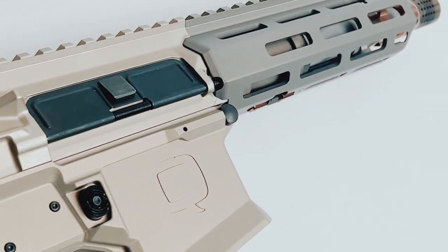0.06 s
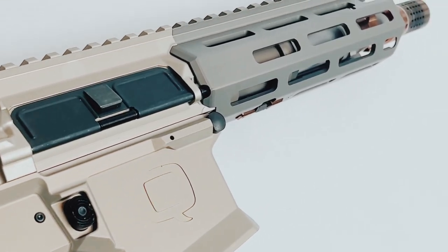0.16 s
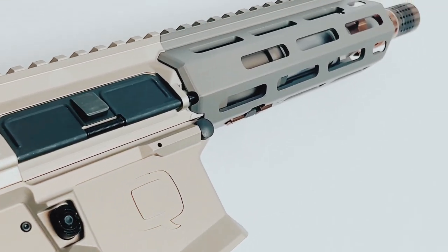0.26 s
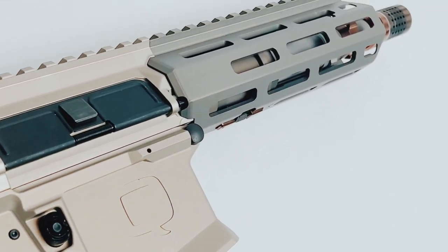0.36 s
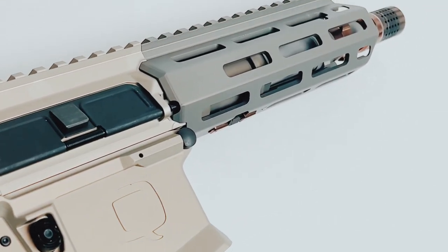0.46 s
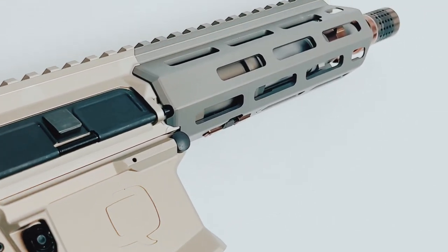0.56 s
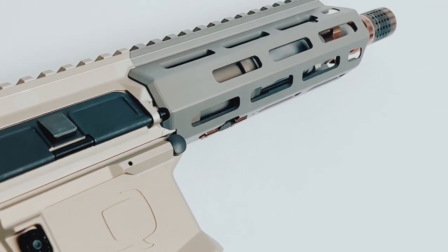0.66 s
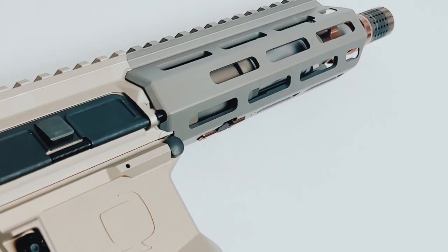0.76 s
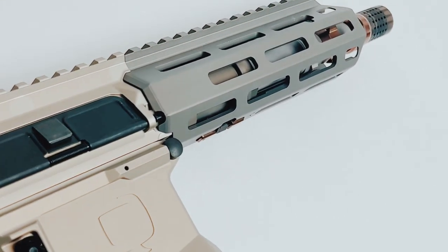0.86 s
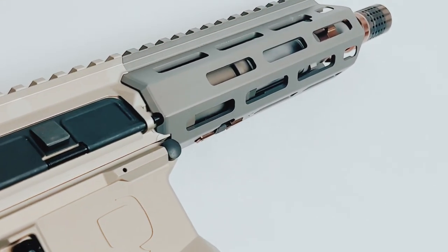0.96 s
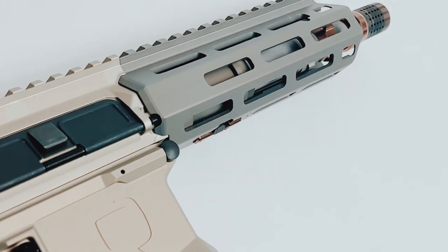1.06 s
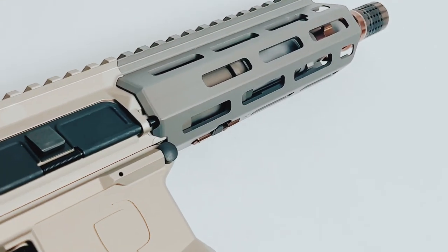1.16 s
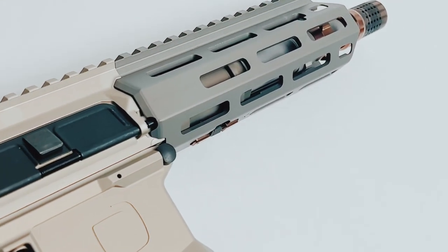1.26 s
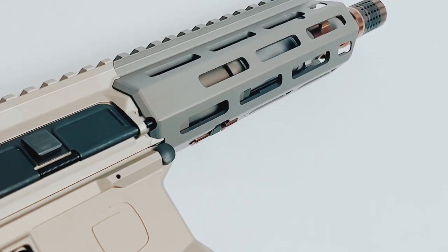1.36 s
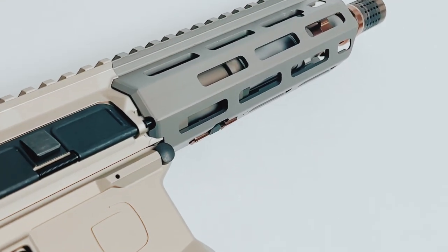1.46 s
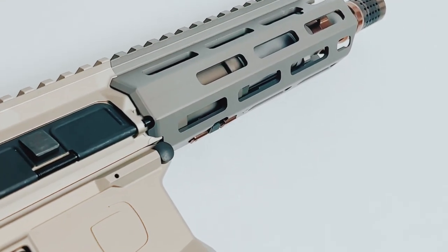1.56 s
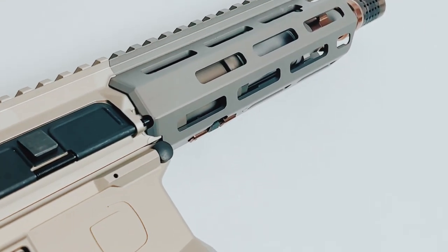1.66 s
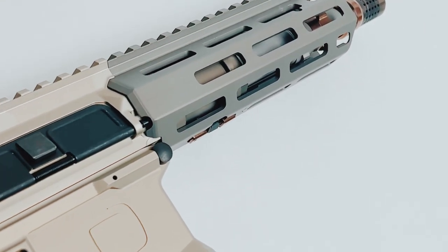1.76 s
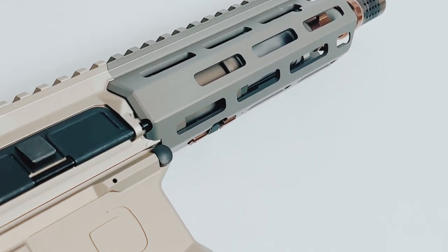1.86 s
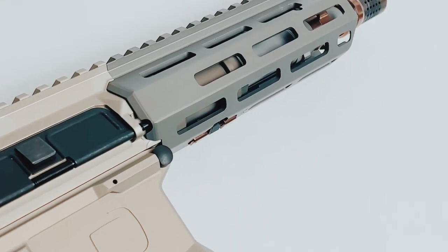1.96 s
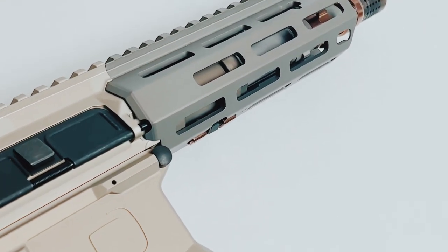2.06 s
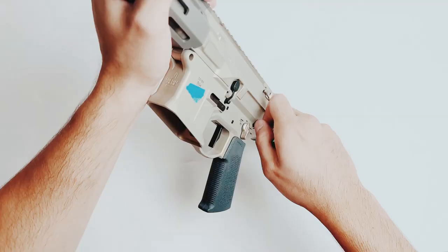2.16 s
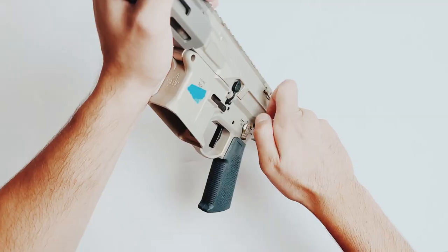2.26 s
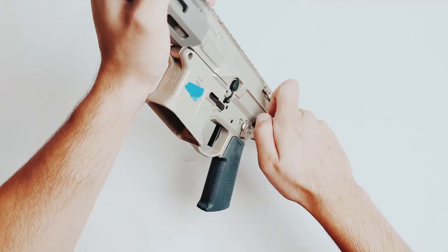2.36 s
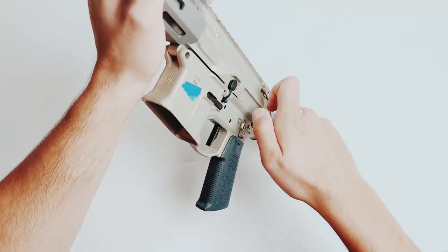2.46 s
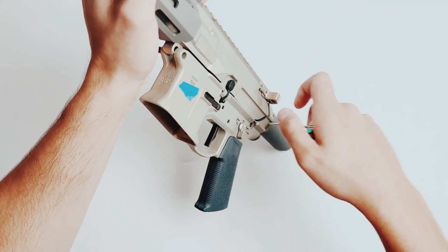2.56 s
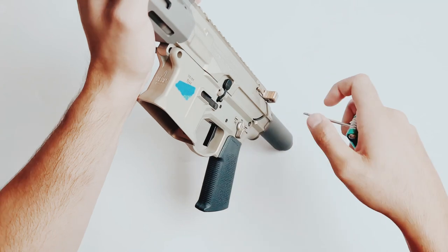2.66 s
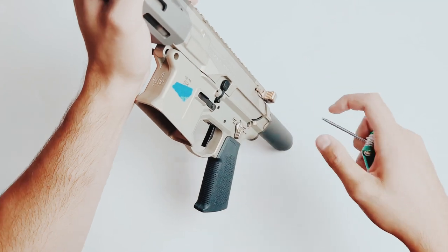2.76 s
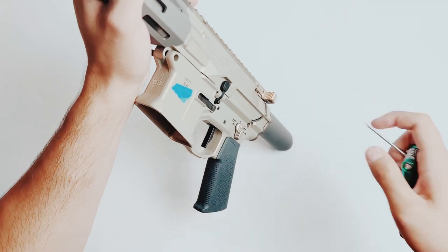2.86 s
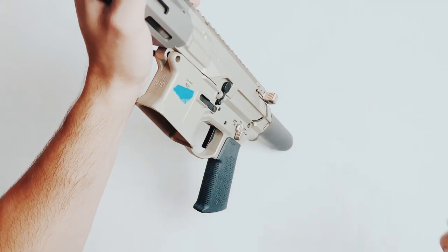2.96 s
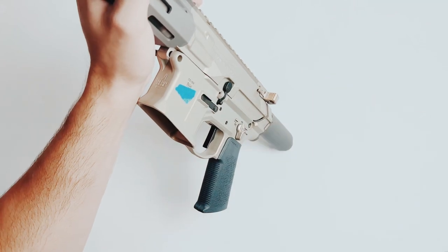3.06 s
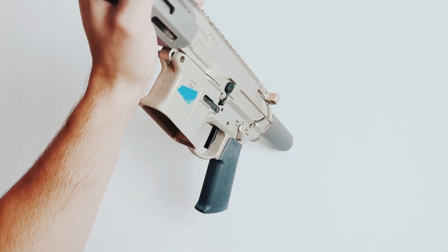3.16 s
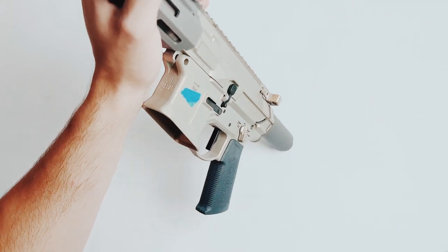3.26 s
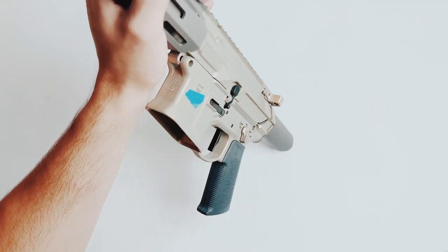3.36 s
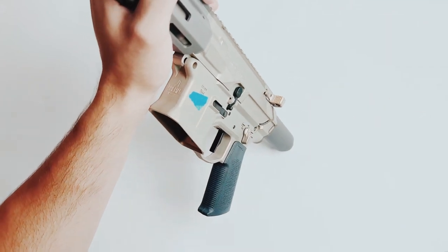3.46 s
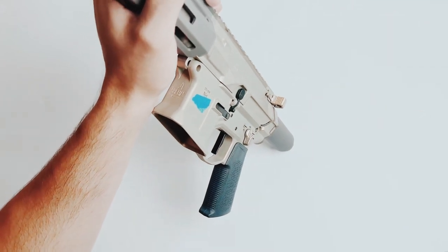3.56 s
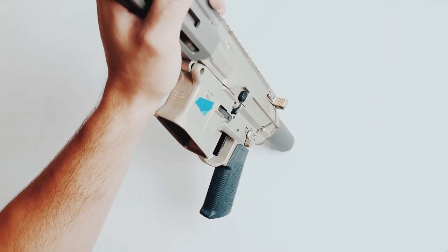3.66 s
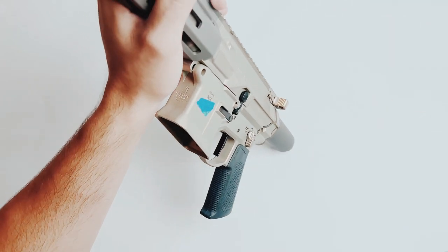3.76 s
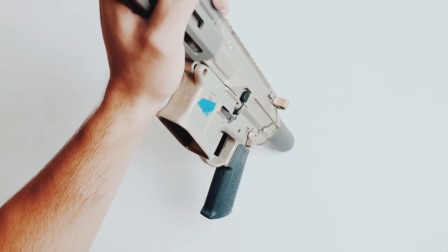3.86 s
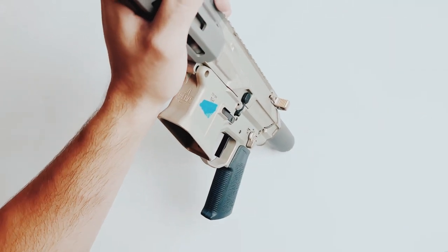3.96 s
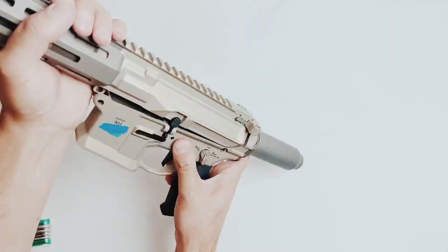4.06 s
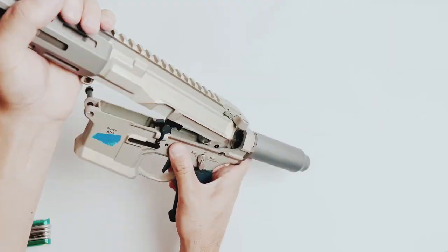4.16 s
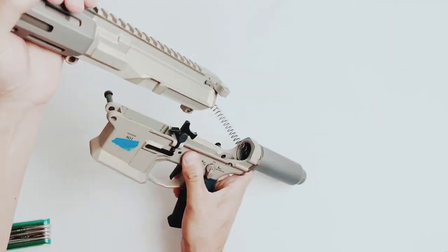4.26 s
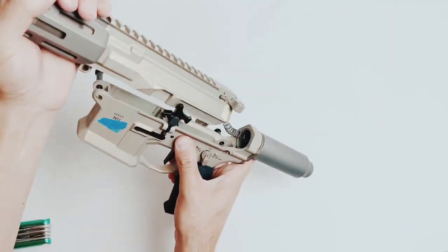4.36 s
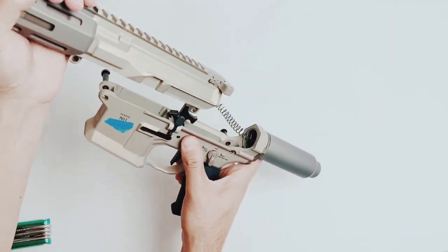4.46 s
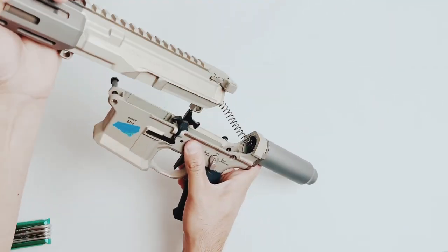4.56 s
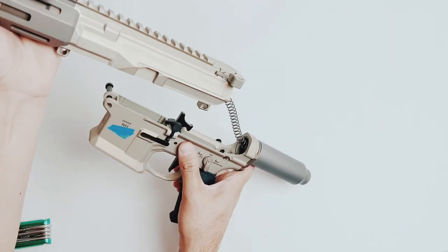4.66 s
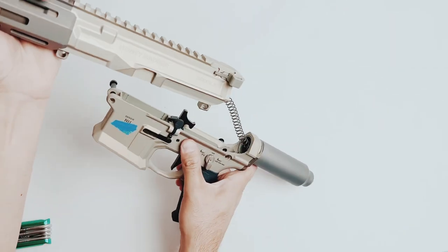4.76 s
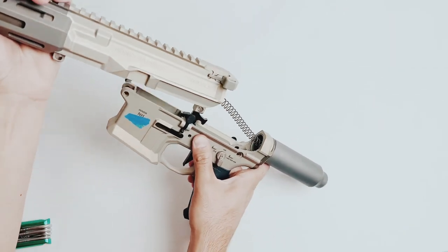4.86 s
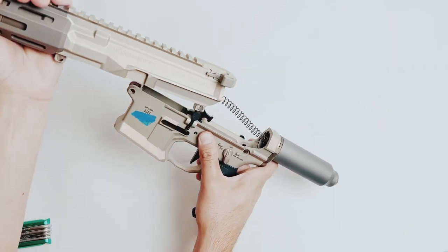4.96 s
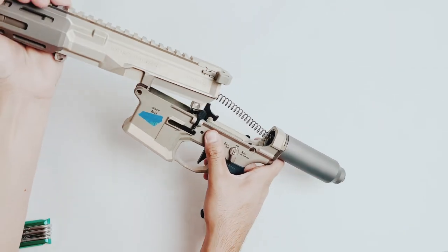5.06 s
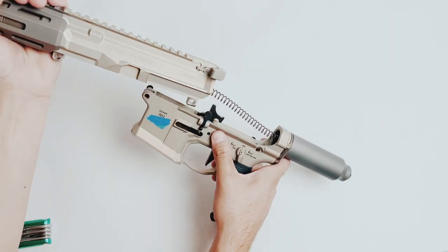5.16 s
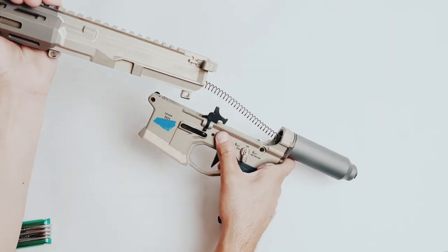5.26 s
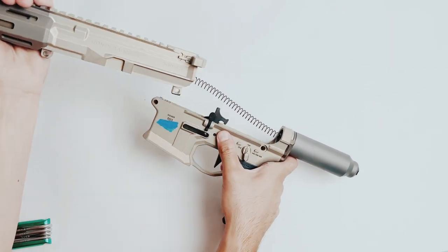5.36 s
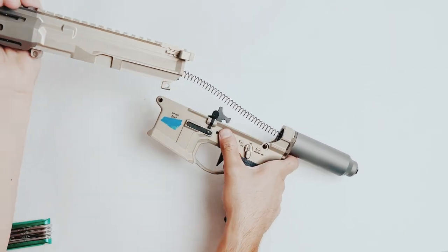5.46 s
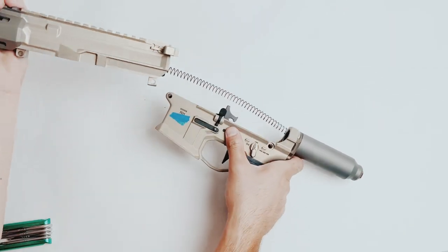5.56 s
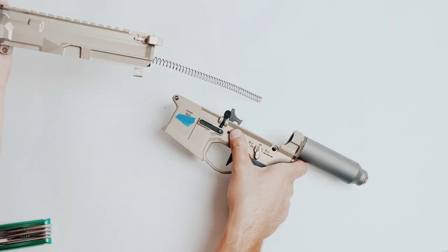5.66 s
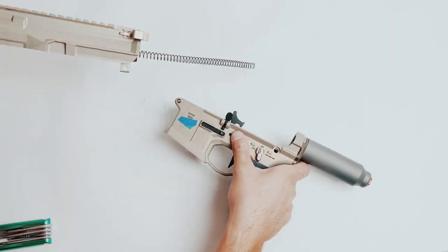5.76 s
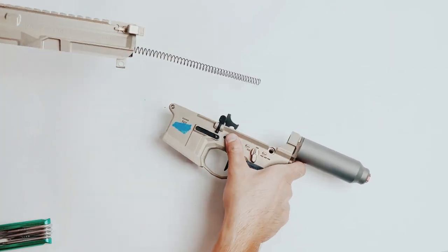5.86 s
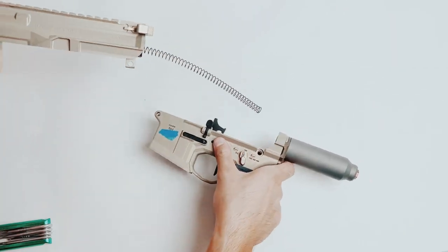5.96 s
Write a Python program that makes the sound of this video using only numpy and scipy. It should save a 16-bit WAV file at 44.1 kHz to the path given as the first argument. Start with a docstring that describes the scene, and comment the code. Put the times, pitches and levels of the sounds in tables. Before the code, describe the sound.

In a small quiet room, close to the microphone, low hum and soft hand bumps come first. After two seconds a tight pin clicks out in two quick groups, with dull thuds and a tiny squeal. A near-silent pause follows, then the metal halves unlatch with bright, hard clacks and a raspy twang of spring. Faint scraping trails off into a last small click.

```python
"""In a small quiet room, hands take a rifle apart just above a bench. A pin is pushed out with a click and a scrape,
the upper and lower halves unlatch and clack together, and a long coil spring rasps out of its tube.
Contacts are noise bursts with ringing modes; scrapes, squeals and the spring are tiny random clicks sent
through filters, with wavering tones for the singing. Dull swelling knocks come through the bench, the palm
and fingers brush the parts, and a low hum, soft rumble and faint hiss lie underneath."""
import sys
import numpy as np
from scipy import signal
from scipy.fft import rfft, irfft
from scipy.io import wavfile
from scipy.ndimage import uniform_filter1d

SR = 44100
rng = np.random.default_rng(int(sys.argv[2]) if len(sys.argv) > 2 else 0)


def to_wav(sig):
    """Store sig (one row per channel, or 1-D mono) as 16-bit WAV at the path in sys.argv[1].

    Samples outside -1..1 are clipped; the rate is SR.
    """
    pcm = np.clip(np.atleast_2d(sig), -1, 1) * 32767
    pcm = np.round(pcm).astype(np.int16)
    wavfile.write(sys.argv[1], SR, pcm.T)  # frames by channels


N = 264745

# metal-on-metal contacts: start_s, level_db, bass_db (weight), treble_slope_db_per_octave (hardness), t60_s
# t60_s is always the time to fade by 60 dB; levels are set before any trim inside the functions
BLOWS = [(1.747, -48.5, 7.5, -22, 0.076), (2.073, -63.5, 5.5, -21, 0.041), (2.197, -55.5, 2, -7, 0.2),
         (2.218, -47.5, -16, -15, .07), (2.232, -51.5, -1, 9, 0.078), (2.2336, -34.5, -3, -7, 0.096),
         (2.2408, -44, 1, -2.5, 0.097), (2.256, -33.5, -4, -10, 0.09), (2.433, -56.5, 8.5, -1, 0.39),
         (2.511, -49.5, 0, 0.5, 0.044), (2.5233, -34, -2, -10.5, 0.11), (2.539, -46, 4, -2.5, 0.05),
         (2.552, -43, -5, -13, 0.073), (2.561, -48, 17, -11.5, 0.11), (2.668, -34, -4, -7, 0.074),
         (2.956, -64.5, 7, -9.5, 0.038), (3.058, -65.5, 0.5, 1.9, .04), (3.893, -58.5, 8.5, -4, 0.091),
         (3.994, -41, 5, 0, 0.025), (4.0006, -39.5, -4, -7, 0.029), (4.121, -49, -9, -19, 0.048),
         (4.1445, -32, -10.5, 2.2, 0.21), (4.1531, -24.5, -29.5, -7.5, 0.027),
         (4.1603, -35, -26.5, 3.5, 0.088), (4.1659, -32, -19.5, -6, 0.064), (4.172, -23.5, -38, -8, .028),
         (4.339, -20.5, -45.5, -4.5, 0.023), (4.342, -28.5, -14.5, -1, 0.078),
         (4.3524, -33.5, -24, -2, .056), (4.3572, -36, -8, -12.5, 0.079), (4.875, -49.5, -27, -11, 0.092),
         (4.908, -47, -16, -6, 0.096), (4.917, -37.5, -21.5, -3, 0.056), (5.134, -80, -8, 5, .02),
         (5.463, -81, -10, 9.5, .03), (5.577, -70.5, -3.5, 9.5, 0.096), (5.683, -56.5, 1.5, 0.5, 0.22),
         (5.728, -69, 17, 6, .08), (5.873, -41.5, -2, -7.5, 0.11)]
# centres of the five pitch regions of a contact: pitch_hz
BLOW_HZ = [500, 1550, 3450, 6900, 12400]
# colour that all contacts share in those regions: level_db
CONTACT_DB = [-1, -0.97, 1, -0.32, -.8]
# ringing of the two halves: pitch_hz, relative_level_db, t60_s
BODY = [(376, 5, 0.048), (453.3, 0, 0.071), (744, -8, 0.13), (944, -3.5, 0.057), (1066, -10.5, 0.11),
        (1285, -3, 0.067), (1533, -4.5, 0.043), (1674, -7, 0.13), (1844, 0, 0.04), (2152, -2, 0.085),
        (2560, -7, 0.098), (2827, -2, 0.18), (3070, -8, 0.12), (3550, -13.5, 0.027), (3990, -6, 0.079),
        (4265, -8, 0.13), (5650, -5, 0.078), (6540, -5, 0.087), (7790, -2, .06), (8570, 7, .05)]
# resonances of the scraped coil spring: pitch_hz, width_hz, relative_level_db
COIL = [(3240, 470, -10.5), (6070, 520, -20.5), (7240, 130, -0.5), (7490, 170, 1), (7690, 73, 3),
        (8070, 660, -8), (9290, 300, -9), (12000, 360, -24), (14000, 300, -23), (13440, 180, 3),
        (14600, 62, 0.5), (15700, 160, -5)]
COIL_TONE_HZ, COIL_TONE_WIDTH_HZ = 2831, 80
# the spring drags over the rim of its tube in short tugs, then in one long pull:
# full_s (time at which the swell reaches full strength, here and below), length_s, rasp_db, singing_tone_db
TUGS = [(4.141, 0.048, -52, -46), (4.19, 0.04, -35.5, -45), (4.25, 0.064, -50, -62.5),
        (4.325, 0.011, -42.5, -58), (4.457, 0.012, -51, -59), (4.615, 0.026, -65.5, -67),
        (4.717, 0.0074, -73, -68.5), (4.811, 0.017, -59.5, -56.5), (4.988, 0.015, -67, -59),
        (5.064, 0.095, -63, -61), (5.176, 0.41, -61.5, -57.5), (5.536, 0.015, -52, -46)]
TUG_RISE_S, TUG_T60_S = 0.038, 0.11
# tone of dry friction: pitch_hz, relative_level_db
FRICTION = [(150, -7.5), (400, -2.5), (800, -0.5), (1800, 0), (4000, -1), (5200, -5.5), (7800, 1),
            (9000, -6.5), (10500, -10), (16000, -11.5)]
# the metal faces rub, then come to rest: full_s, length_s, level_db, t60_s, brightness_db
RUBS = [(2.22, .01, -51, .26, -9.5), (2.487, 0.024, -47, .19, -2), (3.894, 0.078, -71, 0.13, -5),
        (4.001, 0.028, -50, 0.3, -3.5), (4.148, 0.06, -40.5, 0.16, 4), (4.197, 0.029, -38, .12, 4),
        (4.348, 0.0042, -30, 0.053, 2), (4.428, 0.031, -58, 0.34, 0), (4.804, 0.021, -63, 0.13, -1),
        (4.969, 0.064, -63, 0.13, -1.5), (5.363, .38, -69, 0.49, -6), (5.88, 0.13, -67.5, 0.34, 6.5)]
RUB_RISE_S = 0.055
RUB_SPLIT_HZ = 3800  # brightness tips the balance around this frequency
# the tight pin binds and squeals: full_s, length_s, level_db
SQUEALS = [(2.478, .014, -48.5), (2.497, .004, -39), (2.56, .006, -61)]
SQUEAL_RISE_S, SQUEAL_T60_S = 0.04, 0.06
PIN_HZ = 3050  # pitch of the sliding pin's squeal
# small parts ring briefly when jerked or knocked: start_s, pitch_hz, peak_db, t60_s
SMALL_RINGS = [(2.241, 3050, -27, 0.015), (2.2563, 3000, -32, 0.021), (2.5243, 3000, -35, 0.042),
               (2.55, 3080, -42, 0.029), (2.564, 3100, -40.5, 0.03), (2.956, 3015, -60, 0.04),
               (4.1193, 2500, -42.5, 0.043)]
# the steel key slips off the pin and rings on: pitch_hz, level_db, t60_s
KEY = [(1240, -65.5, 0.56), (2150, -67, 0.36), (3100, -59, 0.39), (3860, -58.5, 0.34), (5300, -59.5, 0.18)]
KEY_S = 2.668
# dull knocks through the hands and bench: start_s, level_db, pitch_hz, swell_s, t60_s
THUMPS = [(1.116, -42, 61.6, 0.038, 0.49), (1.192, -60, 58, .01, 0.11), (1.759, -35, 108.7, 0.0092, 0.09),
          (1.798, -42.5, 85.4, 0.0065, 0.14), (1.948, -49.5, 60.8, 0.087, 0.3),
          (2.233, -39.5, 210, .002, .04), (2.244, -24, 75.4, 0.021, 0.12),
          (2.257, -40.5, 105.8, 0.0055, 0.087), (2.327, -38, 69.7, 0.008, 0.36),
          (2.448, -38.5, 63.5, 0.011, 0.22), (2.517, -27.5, 238, 0.0009, 0.017),
          (2.521, -22.5, 64, 0.0092, 0.17), (2.555, -21.5, 75, 0.0092, 0.2), (2.655, -35, 75, 0.0079, 0.1),
          (4.344, -41.5, 277, 0.0045, 0.05), (5.883, -37.5, 60, 0.007, 0.21)]
# the hands tighten their grip: full_s, length_s, level_db
GRIPS = [(1.2, 0.52, -51.5), (1.8, 0.24, -53), (2.3, 0.4, -51.5)]
GRIP_RISE_S, GRIP_T60_S, GRIP_REST_DB = 0.46, 0.65, -68
# soft scuffs of the palm: start_s, level_db, brightness_db, t60_s
SCUFFS = [(0.932, -55, -13.5, 0.16), (1.77, -59, -5.5, 0.2), (1.81, -57, -13, 0.1),
          (5.732, -58.5, -20, 0.23), (5.775, -60.5, -6, 0.18), (5.832, -50.5, 3, 0.12)]
# fingers creep over the finish: full_s, length_s, level_db
CREEPS = [(1.26, 0.058, -82.5), (1.35, 0.013, -69), (1.683, .002, -73), (3.8, 0.038, -83.5)]
CREEP_RISE_S, CREEP_T60_S = 0.055, 0.077
# tone of the room rumble: pitch_hz, relative_level_db
AIR = [(25, -31), (42, -3.5), (60, -0.5), (85, -10), (120, -7), (190, -6.5), (230, -15.5), (380, -21.5),
       (700, -38.5), (1200, -43.5), (1600, -34), (2100, -39), (2700, -59), (7000, -56.5), (16000, -78.5)]
AIR_DB = -57.5  # rumble level before its trim
# slowly wavering hum tones: pitch_hz, level_db
HUM = [(59.2, -60), (96.9, -66), (193.8, -68.5), (382.2, -82)]
# the lowest hum tone rises near the end and stays up
HUM_SWELL_S, HUM_SWELL_RISE_S, HUM_SWELL_DB = 4.95, 0.2, 5.5
# faint hiss of the room, joined by straight lines: time_s, level_db
HISS = [(0, -93), (2.1, -99), (2.8, -71.5), (3.6, -75), (4.6, -68.5), (6, -72)]
TOP_HZ = 15900  # nothing much is left above this


def clacks(db=-5.0):
    """Parts knock together: heavy contacts have more bass, hard ones more treble."""
    out = np.zeros(N + SR)
    octaves = np.log2(np.array(BLOW_HZ[1:]) / BLOW_HZ[1])
    for s, level, bass, slope, t60 in BLOWS:
        strengths = level + np.r_[bass, slope * octaves] + CONTACT_DB
        x = blow(strengths, t60)
        i = int(s * SR)
        out[i:i + len(x)] += x
    return undb(db) * out[:N]


def blow(strengths, t60, crack_t60=0.023, crack_db=6, modes_db=-13, scatter_db=2.0, bass_db=-9):
    """A crack of contact, a short wash of dense modes, and the longer ring of the body."""
    t = np.arange(SR // 4) / SR
    envelope = undb(crack_db) * fade(t, crack_t60) + fade(t, t60)
    x = rng.standard_normal(len(t)) * envelope
    for hz, db, ring_t60 in BODY:
        size, sign = rng.standard_normal(2)
        gain = np.sign(sign) * undb(modes_db + db + scatter_db * size)
        x += gain * np.sin(2 * np.pi * hz * t) * fade(t, ring_t60)
    # set how much each region gets in the first instant (512 samples)
    edges = np.array([250, 1000, 2400, 5000, 9500, 16000])  # Hz
    order = 512
    power = 2 * np.abs(rfft(x[:order]) / order) ** 2
    held = np.diff(np.cumsum(power)[edges * order // SR])
    gains = np.array(strengths) - 10 * np.log10(held)
    return colour(x, [(80, gains[0] + bass_db), *zip(BLOW_HZ, gains)])


def spring(rasp_db=-1, tone_db=-1, grit_db=-18):
    """Coils tick over the rim; the wire sings in one low mode and rasps in the higher ones."""
    rasp, tone = tugs()
    ticks = slips(rate=2200, spread_db=4, catch_rate=160, catch_db=1.8)
    wire = unit(sum(undb(db) * resonate(resonate(ticks, hz, width), hz, width) for hz, width, db in COIL))
    # stronger pulls grind with a broad grit
    grit = unit(colour(ticks, [(500, -36.0), (1800, -9), (5000, -1), (12000, 11.0), (16000, 10)]))
    grit *= undb(grit_db) + 1.2 * rasp / rasp.max()
    sing = squeal(ticks, COIL_TONE_HZ, waver_hz=20, width_hz=COIL_TONE_WIDTH_HZ, rough_db=-4)
    return undb(rasp_db) * rasp * (wire + grit) + undb(tone_db) * tone * sing


def tugs(catch_rate=28, catch_db=1.0):
    """Strength of the spring's rasp and tone: each pull runs unevenly as the coils catch."""
    catching = undb(catch_db * walk(catch_rate))
    rasp = strokes([(full_s, length, db) for full_s, length, db, _ in TUGS], TUG_RISE_S, TUG_T60_S)
    tone = strokes([(full_s, length, db) for full_s, length, _, db in TUGS], TUG_RISE_S, TUG_T60_S)
    return rasp * catching, tone * catching


def sliding(friction_db=-1, body_db=3):
    """Dry friction shakes the body; the tight pin squeals in its hole."""
    bite = strokes(SQUEALS, SQUEAL_RISE_S, SQUEAL_T60_S)
    friction = slips(rate=4500, spread_db=0.5, catch_rate=120, catch_db=2.0)
    # a mode's fade time sets the width of its resonance
    body = sum(undb(db) * resonate(friction, hz, np.log(1000) / np.pi / t60) for hz, db, t60 in BODY)
    faces = unit(colour(friction + undb(body_db) * body, FRICTION))
    pin = squeal(friction, PIN_HZ, waver_hz=64.3, width_hz=460, rough_db=-8.0)
    return undb(friction_db) * rubs(faces) + bite * pin


def rubs(faces):
    """Play the friction in separate rubs, some dull and some bright."""
    dull = signal.sosfilt(signal.butter(1, RUB_SPLIT_HZ, fs=SR, output="sos"), faces)
    levels = np.array([db + stroke(full_s, length, RUB_RISE_S, t60) for full_s, length, db, t60, _ in RUBS])
    bright = np.array(RUBS)[:, -1:]
    dull_gain = undb(np.max(levels - bright / 2, axis=0))
    bright_gain = undb(np.max(levels + bright, axis=0))
    return dull_gain * dull + bright_gain * (faces - dull)


def squeal(ticks, hz, waver_hz, width_hz, rough_db):
    """Friction locks to one mode: a wavering tone, roughened by the separate slips."""
    tone = np.sqrt(2) * np.sin(2 * np.pi * np.cumsum(hz + waver_hz * walk(90)) / SR)
    rough = unit(resonate(resonate(ticks, hz, width_hz), hz, 500))
    return unit(tone + undb(rough_db) * rough)


def small_parts_and_key(split=0.016):
    """Small parts ring briefly when jerked or knocked; the free key rings longer, in beating pairs of bending modes."""
    small = sum(ring(*row) for row in SMALL_RINGS)
    pair = (1 - split, 1 + split)
    key = sum(ring(KEY_S, hz * side, db, t60) for hz, db, t60 in KEY for side in pair) / 2
    return small + key


def ring(s, hz, db, t60):
    """One struck mode: a sine that starts at time s and dies away."""
    t = np.maximum(np.arange(N) / SR - s, 0)
    return undb(db) * np.sin(2 * np.pi * hz * t) * fade(t, t60)


def thumps(thud_db=-15):
    """Soft pushes swell and die in the low mode of the bench, with a woolly thud added."""
    out = np.zeros(N)
    thud_tone = [(50, -17.5), (130, 13), (250, 0.0), (500, -17), (1000, -44), (3000, -49.0)]
    thud = undb(thud_db) * unit(colour(rng.standard_normal(N), thud_tone))
    for s, db, hz, swell, t60 in THUMPS:
        t = np.maximum(np.arange(N) / SR - s, 0)
        shape = np.minimum(t / swell, 1) * fade(np.maximum(t - swell, 0), t60)
        out += undb(db) * shape * (np.sin(2 * np.pi * hz * t) + thud)
    return out


def grip(hz=82, width_hz=22):
    """Trembling hands keep the low mode stirring: noise through a narrow resonance."""
    effort = np.maximum(strokes(GRIPS, GRIP_RISE_S, GRIP_T60_S), undb(GRIP_REST_DB))
    return effort * unit(resonate(resonate(rng.standard_normal(N), hz, width_hz), hz, width_hz))


def scuffs(swell_s=0.01):
    """The palm brushes the hollow grip: woolly noise bursts, some brighter than others."""
    out = np.zeros(N)
    t = np.arange(SR // 4) / SR
    for s, db, bright_db, t60 in SCUFFS:
        tone = [(150, -6), (450, 2), (800, -9), (1900, bright_db - 9), (3500, bright_db - 28), (12000, -54)]
        brush = unit(colour(rng.standard_normal(len(t)), tone))
        x = undb(db) * brush * np.minimum(t / swell_s, 1) * fade(t, t60)
        i = int(s * SR)
        out[i:i + len(x)] += x[:N - i]
    return out


def fingers():
    """Skin creeps over the metal in fine crackles."""
    clicks = slips(rate=900, spread_db=5, catch_rate=84, catch_db=8.0)
    crackle = colour(clicks, [(2000, -25.5), (5000, -3.5), (8500, 8.0), (12000, -11), (15000, -15)])
    return strokes(CREEPS, CREEP_RISE_S, CREEP_T60_S) * unit(crackle)


def bench(x, db=-6, delay_s=0.00066, t60=0.035):
    """Bench, hands and parts scatter the sound within milliseconds, with opposite sign at the two ports."""
    t = np.arange(SR // 16) / SR
    echo = rng.standard_normal(len(t)) * (t > delay_s) * fade(t, t60)
    scattered = signal.fftconvolve(x, echo / np.linalg.norm(echo))[:N]
    return undb(db) * scattered * np.array([[1], [-1]])


def room(x, wet_db=-14, t60=0.48, treble_t60=0.22, split_hz=5000, build_s=0.013):
    """Close walls give a short diffuse tail, different at each port; the treble dies first."""
    t = np.arange(SR // 2) / SR
    tails = []
    for noise in rng.standard_normal((2, len(t))):
        low = signal.sosfilt(signal.butter(2, split_hz, fs=SR, output="sos"), noise)
        high = signal.sosfilt(signal.butter(2, split_hz, "high", fs=SR, output="sos"), noise)
        # subtracting the treble joins the two bands without a notch
        tail = (low * fade(t, t60) - high * fade(t, treble_t60)) * np.minimum(t / build_s, 1)
        tails.append(signal.fftconvolve(x, tail / np.sqrt(np.sum(tail ** 2)))[:N])
    return undb(wet_db) * np.array(tails)


def background(air_db=-3.0, hum_db=-1, waver_db=2, side_db=-14):
    """Low room rumble and faint hiss from filtered noise, with a wavering hum of sines."""
    t = np.arange(N) / SR
    mid, side = (unit(colour(rng.standard_normal(N), AIR)) for _ in range(2))
    # the side part makes left and right differ
    side = colour(side, [(60, side_db - 11.5), (300, side_db), (2000, 3)])
    air = undb(AIR_DB + air_db) * np.array([mid + side, mid - side])
    swell = HUM_SWELL_DB * np.clip((t - HUM_SWELL_S) / HUM_SWELL_RISE_S, 0, 1)
    hum = np.zeros(N)
    for k, (hz, db) in enumerate(HUM):
        level = db + hum_db + waver_db * walk(3.4)
        if k == 0:
            level = level + swell
        hum += undb(level) * np.sqrt(2) * np.sin(2 * np.pi * hz * t + 0.17 * walk(4.8))
    hiss_tone = [(100, 3.0), (400, 13.0), (800, -6.5), (1300, -8.5), (2100, -1.0), (3000, -18.0),
                 (7000, -30.5), (16000, -38.0)]
    hiss = unit(colour(rng.standard_normal(N), hiss_tone))
    return air + hum + undb(np.interp(t, *np.transpose(HISS))) * hiss


def ports(x, lag):
    """The sound reaches the left microphone port lag samples after the right."""
    turn = np.exp(-2j * np.pi * np.fft.rfftfreq(N) * lag)
    return np.array([irfft(rfft(x) * turn, N), x])


def slips(rate, spread_db, catch_rate, catch_db):
    """Stick and slip: many tiny clicks per second, of uneven size, that come in stronger bunches."""
    happens = rng.random(N) < rate / SR
    clicks = happens * rng.choice([-1, 1], N) * undb(spread_db * rng.standard_normal(N))
    return unit(clicks * undb(catch_db * walk(catch_rate)))


def stroke(full_s, length, rise_s, t60):
    """One hand movement, in dB: swells by 60 dB in rise_s up to time full_s, holds for its length, dies away."""
    times = [full_s - 2 * rise_s, full_s, full_s + length, full_s + length + 2 * t60]
    return np.interp(np.arange(N) / SR, times, [-120, 0, 0, -120])


def strokes(rows, rise_s, t60):
    """Gain curve of several movements (full_s, length_s, level_db) that swell and die alike."""
    return undb(np.max([db + stroke(full_s, length, rise_s, t60) for full_s, length, db in rows], axis=0))


def walk(rate):
    """Slow chance: random levels held for 1/rate seconds, then smoothed twice."""
    k = int(SR / rate)
    steps = np.repeat(rng.standard_normal(N // k + 1), k)
    return unit(uniform_filter1d(uniform_filter1d(steps, k), k)[:N])


def fade(t, t60):
    """Exponential decay, by 60 dB in t60 seconds."""
    return np.exp(-np.log(1000) * t / t60)


def resonate(x, hz, width_hz):
    """One resonance, gain 1 at its centre."""
    return signal.lfilter(*signal.iirpeak(hz, hz / width_hz, fs=SR), x)


def colour(x, points):
    """Filter through (pitch_hz, level_db) points with no sound ahead of time, from the cepstrum of the log gain."""
    size = 8192
    hz, db = np.transpose(points)
    grid = np.maximum(np.fft.rfftfreq(size, 1 / SR), 1)
    gain = undb(np.interp(np.log(grid), np.log(hz), db))
    cepstrum = irfft(np.log(gain))
    # folding the second half onto the first makes the filter minimum phase
    cepstrum[1:size // 2] *= 2
    cepstrum[size // 2 + 1:] = 0
    return signal.fftconvolve(x, irfft(np.exp(rfft(cepstrum))))[:len(x)]


def undb(db):
    """Decibels to gain."""
    return 10 ** (np.asarray(db) / 20)


def unit(x):
    """Scale to an average (rms) level of 1."""
    return x / np.sqrt(np.mean(x ** 2))


def scene():
    """The metal parts sound close to the microphone, with the bench and the room around them."""
    parts = clacks() + sliding() + small_parts_and_key() + fingers() + scuffs()
    coil = spring()
    metal = parts + coil
    knocks = thumps()
    direct = ports(parts, lag=1.0) + ports(coil, lag=0.9)
    scattered = bench(metal, db=-10.5) + bench(knocks, db=-40.5)
    return direct + scattered + room(metal) + knocks + grip() + background()


def record(dry, low_hz=40):
    """Cut the deepest rumble and the extreme treble."""
    dry = signal.sosfilt(signal.butter(4, low_hz, "high", fs=SR, output="sos"), dry)
    return signal.sosfilt(signal.ellip(10, 0.2, 70, TOP_HZ, fs=SR, output="sos"), dry)


dry = scene()
out = record(dry)
to_wav(out)
```